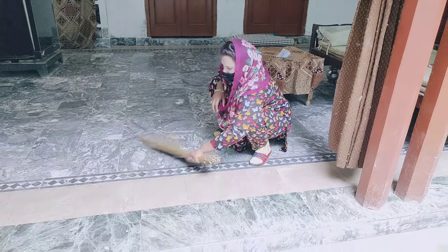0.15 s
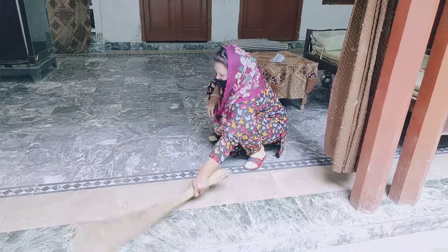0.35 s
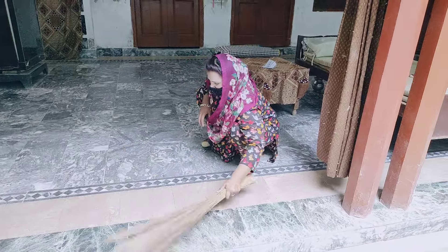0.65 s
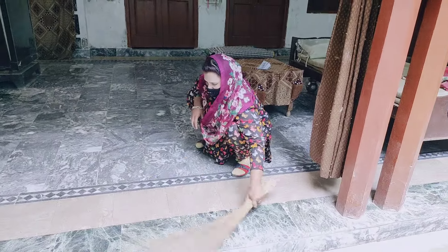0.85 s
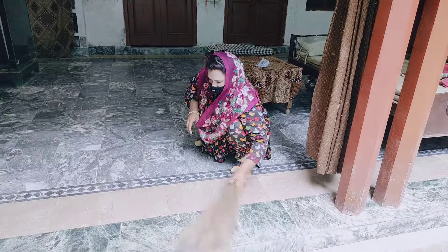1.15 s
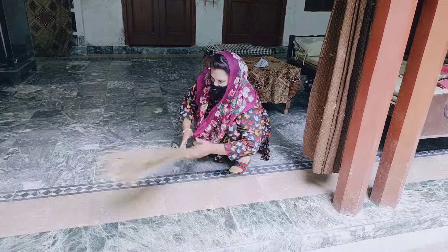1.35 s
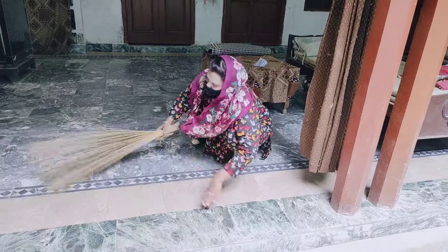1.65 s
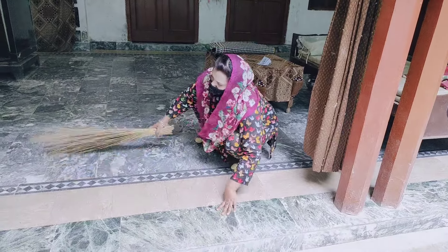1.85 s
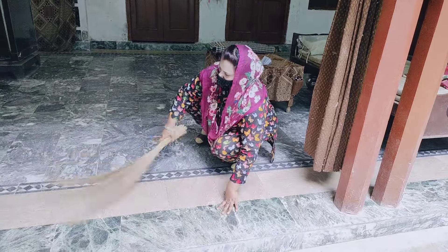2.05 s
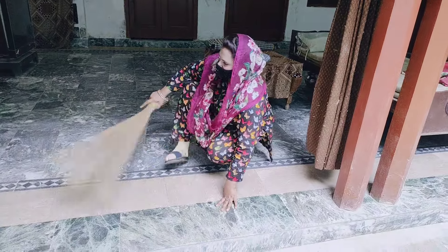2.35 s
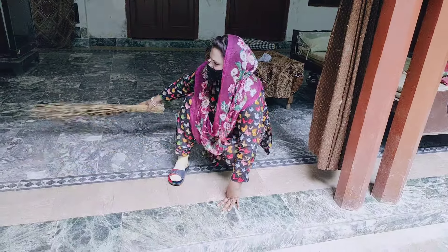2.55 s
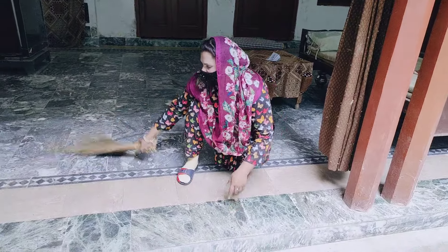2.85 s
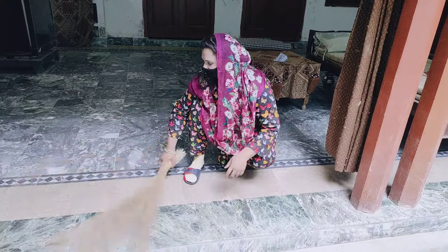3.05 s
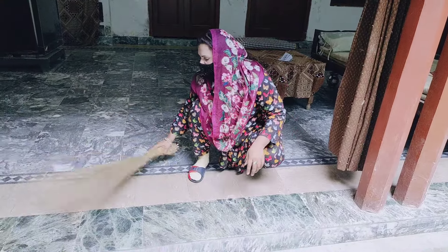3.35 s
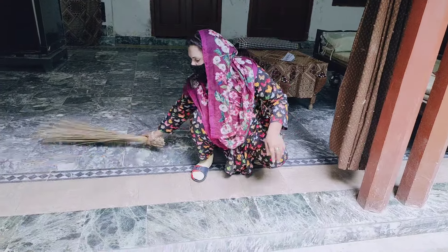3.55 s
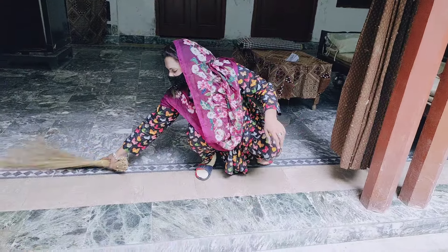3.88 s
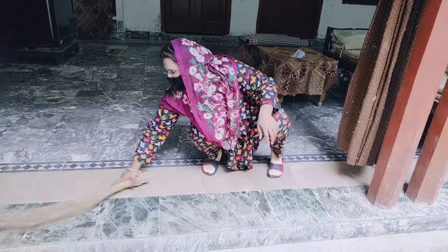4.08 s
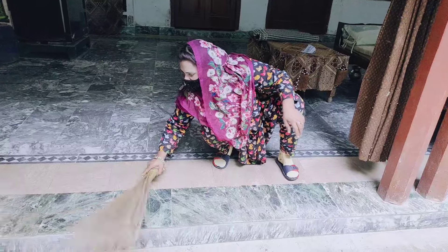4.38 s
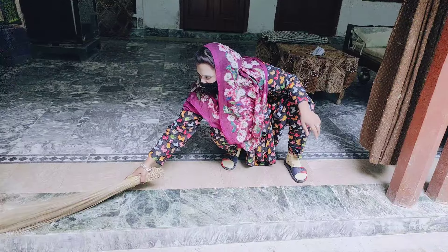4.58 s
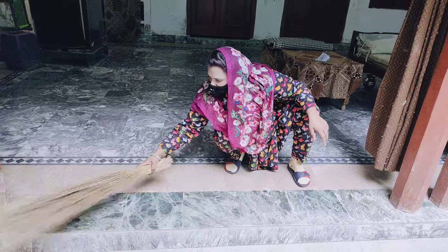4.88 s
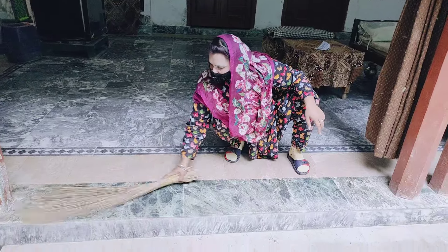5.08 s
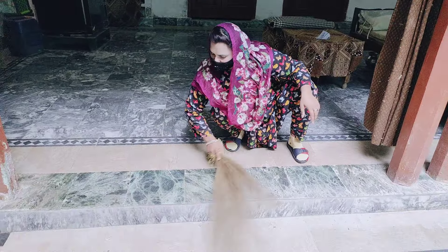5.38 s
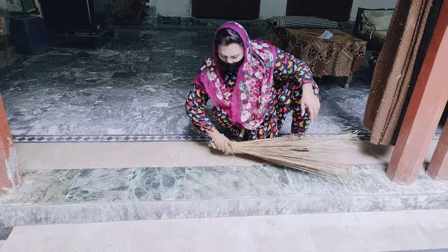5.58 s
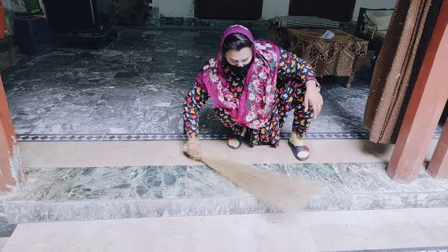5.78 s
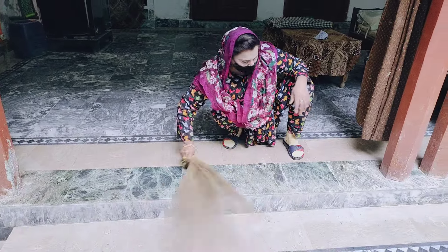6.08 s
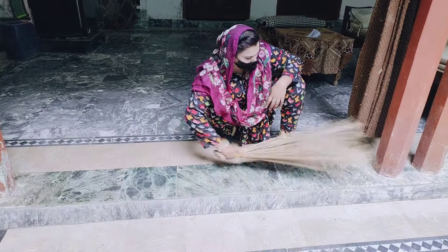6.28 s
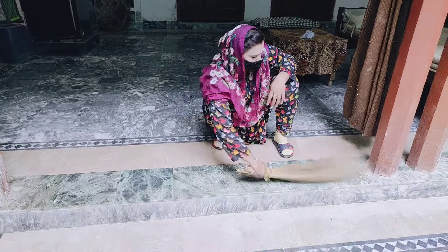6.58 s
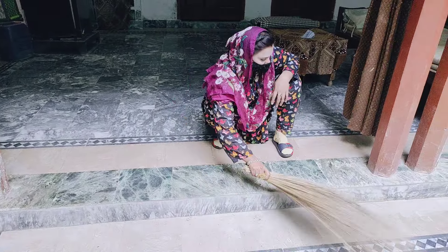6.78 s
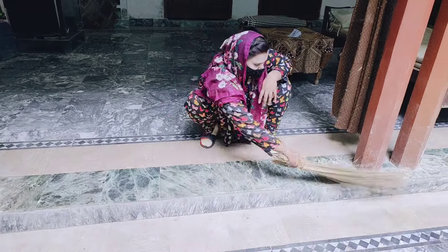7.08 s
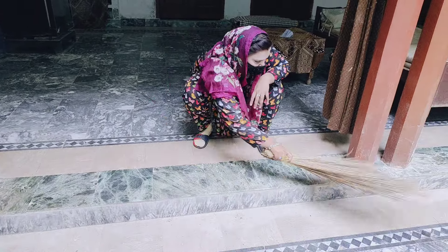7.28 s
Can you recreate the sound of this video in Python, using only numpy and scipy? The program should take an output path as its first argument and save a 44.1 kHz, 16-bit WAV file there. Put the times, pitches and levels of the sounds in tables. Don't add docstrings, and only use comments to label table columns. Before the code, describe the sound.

Close, bright straw swishes brush irregularly over stone, with tiny snaps and a few soft knocks, above a distant low street hum and motor throb.

```python
import sys
import numpy as np
from scipy import signal
from scipy.fft import rfft, irfft
from scipy.io import wavfile

SR = 44100
rng = np.random.default_rng(int(sys.argv[2]) if len(sys.argv) > 2 else 0)


def pcm_store(signal):
    levels = np.round(np.clip(np.atleast_2d(signal), -1, 1) * 32767)
    wavfile.write(sys.argv[1], SR, levels.astype(np.int16).T)


def invert_db(x):
    u = np.asarray(x, float) / 20
    return 10 ** u


N = 327941

# frequency [Hz], level [dB per Hz].
STREET_COLOUR = [(20, -34), (48, -24), (89, -7.5), (129, 1), (220, -9), (300, -7), (590, -15),
                 (1300, -18.5), (2500, -20.5), (5500, -31), (6900, -27), (8500, -29.5), (13500, -38.5)]
# time [s], level [dB].
TRAFFIC_SWELL = [(0.0, -58.5), (2.2, -54.5), (2.4, -50.5), (2.9, -57), (3.3, -52.5), (3.85, -57),
                 (4.55, -54), (5.15, -57.5), (5.4, -52.5), (6.2, -51), (7.44, -53)]
# frequency [Hz], left-right likeness [-1 to 1].
STREET_LIKENESS = [(60, 0.87), (130, 0.89), (290, 0.75), (640, 0.49), (1410, -0.34), (3100, 0.31),
                   (6820, 0.12), (15000, 0.15)]
# start [s], length [s], frequency [Hz], width [Hz].
DRONES = [(0, 7.4, 199, 7), (1.0, 1.1, 165, 4), (.95, .3, 765, 8), (2.2, .5, 72, 8), (2.65, .2, 350, 8),
          (4.93, .5, 510, 12), (4.85, .6, 300, 15), (4.9, .6, 265, 10), (1.5, .8, 260, 10),
          (6.75, .25, 282, 8), (6.3, .4, 268, 6), (6.27, .2, 1900, 500), (6.94, .6, 1850, 350),
          (2.925, .05, 6780, 150), (2.96, .14, 6600, 300)]
DRONE_LEVELS = [-70, -64, -70, -64, -63, -67, -67, -68, -67, -65, -66, -63, -60, -46, -48]
# time [s], frequency [Hz], level [dB].
SECOND_MOTOR = [
    (5.4, 140.5, -75),
    (5.474, 141.7, -64),
    (5.806, 144, -62),
    (5.87, 148.1, -66),
    (6.214, 141.8, -51.5),
    (6.282, 137, -58),
    (6.7, 137.8, -71),
    (6.776, 146.5, -72),
    (7.3, 141.7, -58),
]
# time [s], eighth order [Hz], level [dB].
ENGINE_PASS = [
    (3.5, 105.5, -64),
    (4.15, 117, -61.5),
    (4.62, 107, -66.5),
    (5.0, 106, -67.5),
    (5.43, 111, -60.5),
    (5.6, 122.5, -66),
    (6.48, 132, -54.5),
    (7.03, 125, -63.5),
    (7.44, 130, -65.5),
]
# order, level [dB].
EXHAUST_ORDERS = [(6, -14), (7, -8), (8, 2), (9, -3), (16, -16)]
# time [s], peak level [dB], ring [Hz], left over right [dB], grit level [dB].
TAPS = [
    (2.3565, -32.5, 302, -3, -27),
    (2.389, -43.5, 591, -4, -9),
    (2.539, -59.5, 355, -2, -3),
    (4.026, -51, 2370, -5, 10),
    (4.1958, -36.5, 940, 3, -14),
    (4.208, -38.5, 1240, -3, -9),
]
# time [s], peak level [dB], left over right [dB], decay [ms].
SNAPS = [(0.312, -35, -12, 39), (.638, -35.5, 3, 1.3), (0.662, -44, -22, 0.79), (1.3589, -28.5, -2, 16),
         (3.3494, -44, 21, 2.3), (3.3584, -36, -10, 3.3), (3.366, -36, .5, 3.3), (4.5251, -28, -2, 8.9),
         (4.9167, -46, 5, 6.2), (5.5445, -38, 0.5, 4), (5.6191, -53, 3, 15), (6.2542, -55, 0, 4.4),
         (6.9465, -46, 3, 8)]
# crest [s], hiss level [dB], swell [s], fade [s], pressure of the stalks [dB].
STROKES = [(0.121, -44, 0.14, .5, -6), (.325, -40, 0.18, 0.26, 3), (.81, -42.5, 0.15, 0.35, 3),
           (0.931, -39.5, 0.29, 0.13, 0), (1.385, -47.5, 0.042, 1, 0.5), (1.97, -43, 0.22, 0.36, 1),
           (2.11, -42, 0.3, 0.23, -8.5), (2.73, -45, 0.13, 0.29, 0), (2.982, -32, 0.24, 0.35, -10),
           (3.57, -50, 0.15, 0.68, 0), (3.76, -43, 0.24, 0.81, -34), (4.13, -35.5, 0.36, 0.25, 0.5),
           (4.37, -52.5, 0.76, 0.16, 5), (4.568, -30, 0.051, .24, -1.5), (4.94, -40, 0.026, .25, -7),
           (5.04, -31.5, 0.11, .15, 1), (5.22, -41.5, 0.59, 0.27, 1), (5.629, -41, 0.036, 0.69, 3),
           (5.87, -39.5, 0.34, 0.17, -7), (6.0, -76, 0.13, 0.13, -6), (6.341, -45, 0.08, 0.65, 2),
           (6.611, -35, 0.19, 0.38, 0.5), (6.976, -36.5, 0.048, 0.74, -0.5), (7.43, -41.5, 0.14, 0.48, 0)]
# frequency [Hz], level [dB per Hz].
STRAW_COLOUR = [(300, -40), (600, -22), (1000, -15), (1500, -10), (2500, -6), (3500, -4), (4700, -6),
                (5500, -9.5), (6100, -5.5), (6750, -2), (7300, -3.5), (8200, -6), (11000, -5.5),
                (13200, -1.5)]
RANGE_EDGES_HZ = (2200, 5700, 8200)
# level beside the hiss [dB], share of the pressure,
# share of the swell, share of the fade, shading by the body [share of the pan].
RANGES = [
    (-17, 0.85, 1, 0.72, 0.073),
    (-9.5, 0.54, 0.91, 0.81, 0.52),
    (-10, 0.18, 0.91, 0.92, 0.99),
    (0.5, 0.07, 0.9, 1.13, 0.56),
]
# time [s], lag of the left port [samples], left over right [dB].
BROOM_PATH = [
    (0, -3, -1),
    (1.2, -3, 0),
    (2.0, 3, -.5),
    (2.8, 6, -1),
    (5.3, 5, -1),
    (5.8, -2, 1),
    (6.3, -5, 2),
    (7.0, -6, 6),
    (7.44, -6, 4),
]
# frequency [Hz], left over right [dB].
PORT_COLOUR = [(500, 0), (1500, -4), (2500, -2.5), (4000, 0), (5500, 4), (6500, 0), (11000, 1), (13500, 5),
               (15300, -1)]


def rms_one(x):
    return x / np.sqrt(np.mean(x ** 2) + 1e-20)


def in_time(rows):
    s, *columns = np.transpose(rows)
    return [np.interp(np.arange(N) / SR, s, column) for column in columns]


def at_hz(points):
    hz = np.maximum(np.fft.rfftfreq(N, 1 / SR), 1)
    table_hz, value = np.transpose(points)
    return np.interp(np.log(hz), np.log(table_hz), value)


def drift(rate_hz):
    r = np.exp(-2 * np.pi * rate_hz * 40 / SR)
    noise = rng.standard_normal(N // 40 + 2002)
    slow = signal.lfilter([1], [1, -2 * r, r * r], noise)[2000:]
    return np.interp(np.arange(N) / 40, np.arange(len(slow)), rms_one(slow))


def resonance(x, hz, width_hz):
    r = np.exp(-np.pi * width_hz / SR)
    poles = [1, -2 * r * np.cos(2 * np.pi * hz / SR), r * r]
    return signal.lfilter([(1 - r * r) / 2, 0, (r * r - 1) / 2], poles, x)


def panned(x, pan_db):
    return np.array([x * invert_db(pan_db / 2), x * invert_db(-pan_db / 2)])


def street():
    mid, side = rfft(rng.standard_normal((2, N))) * invert_db(at_hz(STREET_COLOUR))
    alike = at_hz(STREET_LIKENESS)
    both = np.sqrt(1 + alike) * mid + np.sqrt(1 - alike) * side * [[1], [-1]]
    bass = 1 / (1 + (np.fft.rfftfreq(N, 1 / SR) / 450) ** 4)
    rumble = irfft(both * bass, N)
    air = irfft(both * (1 - bass), N)
    traffic_db, = in_time(TRAFFIC_SWELL)
    return rms_one(rumble) * invert_db(traffic_db - 5.5) + rms_one(air) * invert_db(-60.5)


def drones():
    out, t = np.zeros(N), np.arange(N) / SR
    for (start, length, hz, width_hz), db in zip(DRONES, DRONE_LEVELS):
        once = resonance(rng.standard_normal(N), hz, width_hz)
        hum = rms_one(resonance(once, hz, width_hz))
        arch = np.sin(np.pi * np.clip((t - start) / length, 0, 1)).clip(0)
        out += invert_db(db) * hum * np.sqrt(arch)
    return out


def second_motor():
    hz, level_db = in_time(SECOND_MOTOR)
    t = np.arange(N) / SR
    to_nearest_end = np.minimum(t - SECOND_MOTOR[0][0], SECOND_MOTOR[-1][0] - t)
    fade = np.clip(to_nearest_end / 0.15, 0, 1)
    phase = 2 * np.pi * np.cumsum(hz) / SR + 0.17 * drift(11.0)
    return np.sqrt(2) * fade * invert_db(level_db + 2.2 * drift(8.2)) * np.sin(phase)


def engine():
    hz, level_db = in_time(ENGINE_PASS)
    turn = 2 * np.pi * np.cumsum(hz / 8) / SR
    fade_in = np.clip((np.arange(N) / SR - ENGINE_PASS[0][0]) / 0.41, 0, 1)
    throb = np.zeros(N)
    for order, db in EXHAUST_ORDERS:
        throb += invert_db(db + 1.1 * drift(3.7)) * np.sin(order * turn + 0.34 * drift(1.3))
    return np.sqrt(2) * fade_in * invert_db(level_db) * throb


def taps():
    out, t = np.zeros((2, N)), np.arange(SR // 20) / SR
    contact_s = 0.0006
    for s, db, hz, pan_db, grit_db in TAPS:
        push = -np.exp(-((t - contact_s) / 0.0002) ** 2)
        ring = np.sin(2 * np.pi * hz * (t - contact_s)) * np.exp(-t / 0.004)
        sole = 0.45 * ring * (t > contact_s)
        crunch = resonance(resonance(rng.standard_normal(len(t)), 2500, 2000), 2500, 2000)
        grit = invert_db(grit_db) * rms_one(crunch) * np.exp(-t / 0.006)
        at = round(s * SR)
        out[:, at:at + len(t)] += panned(invert_db(db) * (push + sole + grit), pan_db)
    return out


def snaps():
    burst, t = np.zeros((2, N)), np.arange(SR // 5) / SR
    for s, db, pan_db, decay_ms in SNAPS:
        at = round(s * SR)
        burst[:, at:at + len(t)] += panned(invert_db(db - 7.0) * np.exp(-1000 * t / decay_ms), pan_db)
    noise = rfft(rng.standard_normal((2, N)))
    return burst * rms_one(irfft(noise * invert_db(at_hz(STRAW_COLOUR)), N))


def straw_slips(lag, per_s, spread_db, fan_samples, clump_db, shiver_s):
    chance = per_s * invert_db(clump_db * drift(40)) / SR
    at = np.flatnonzero(rng.random(N) < chance)
    strength = invert_db(spread_db * np.minimum(rng.exponential(1, len(at)), 3))
    size = strength * rng.choice([-1, 1], len(at))
    late = at + np.round(lag[at] + fan_samples * rng.standard_normal(len(at))).astype(int)
    left = np.bincount(np.clip(late, 0, N - 1), size, N)
    right = np.bincount(at, size, N)
    shiver = signal.chirp(np.arange(0, shiver_s, 1 / SR), 0, shiver_s, SR / 2)
    return signal.lfilter(shiver, 1, np.array([left, right]))


def stroke_gain(rel_db, pressed, swells, fades):
    s, db, swell, fade, press_db = np.transpose(STROKES)[:, :, None]
    t = np.arange(0, N + 128, 128) / SR
    before = np.clip((s - t) / swell, 0, None)
    after = np.clip((t - s) / fade, 0, None)
    loss_db = 22.5 * (swells * before ** 1.35 + fades * after ** 1.095)
    gains = invert_db(db + rel_db + pressed * press_db - loss_db)
    return np.interp(np.arange(N) / SR, t, np.sqrt(np.sum(gains ** 2, axis=0)))


def broom():
    lag, pan_db = in_time(BROOM_PATH)
    slips = straw_slips(lag, per_s=5000, spread_db=1.0, fan_samples=2.6, clump_db=2.0, shiver_s=0.0012)
    brushing = rms_one(slips) + invert_db(4.0) * rng.standard_normal((2, N))
    colour = rfft(brushing) * invert_db(at_hz(STRAW_COLOUR))
    hz = np.fft.rfftfreq(N, 1 / SR)
    under = [0] + [1 / (1 + (hz / edge) ** 16) for edge in RANGE_EDGES_HZ] + [1]
    out = np.zeros((2, N))
    for k, (rel_db, pressed, swells, fades, shading) in enumerate(RANGES):
        band = rms_one(irfft(colour * (under[k + 1] - under[k]), N))
        flicker_db = 0.6 * drift(20) + 0.7 * drift(70)
        gain = stroke_gain(rel_db, pressed, swells, fades)
        out += band * gain * panned(invert_db(flicker_db), shading * pan_db)
    return out


def veranda(x):
    t, t60_s = np.arange(SR // 2) / SR, 0.4
    tails = rng.standard_normal((2, len(t))) * invert_db(-60 * t / t60_s) * (t > 0.004)
    tails /= np.sqrt(np.sum(tails ** 2, axis=1, keepdims=True))
    return signal.fftconvolve(x, tails, axes=1)[:, :N]


def scene():
    near = broom() + snaps() + taps()
    far = street() + engine() + second_motor() + drones()
    return near + invert_db(-9) * veranda(near) + far


def roll_off(x):
    return signal.sosfilt(signal.butter(12, 16830, fs=SR, output="sos"), x)


def record(dry):
    tilt = invert_db(at_hz(PORT_COLOUR) / 2 * np.array([[1], [-1]]))
    passed = np.fft.rfftfreq(N, 1 / SR) < 15600
    return roll_off(irfft(rfft(dry) * tilt * passed, N))


dry = scene()
out = record(dry)
pcm_store(out)
```